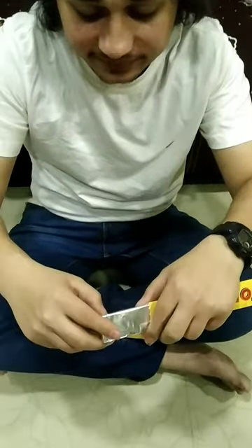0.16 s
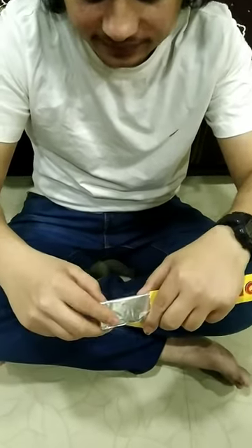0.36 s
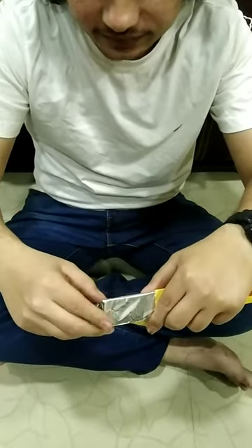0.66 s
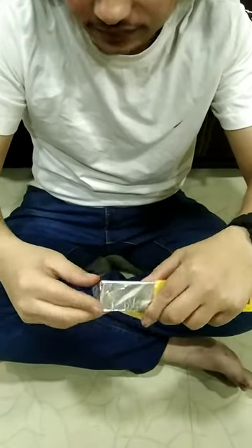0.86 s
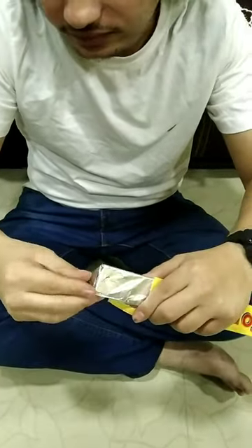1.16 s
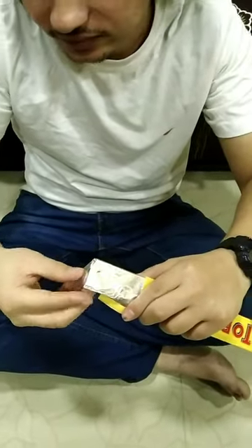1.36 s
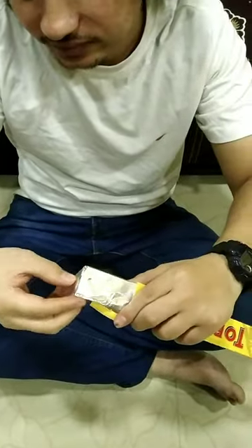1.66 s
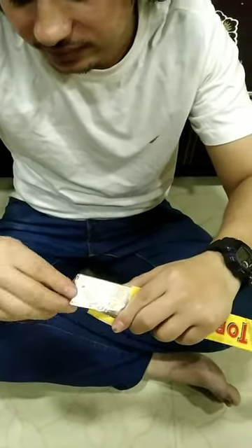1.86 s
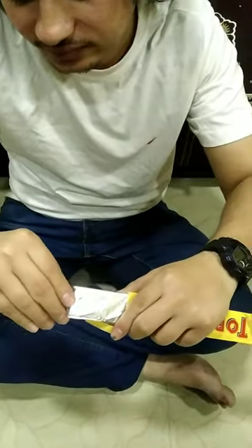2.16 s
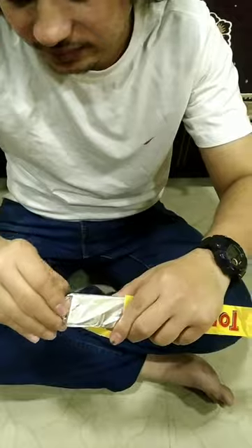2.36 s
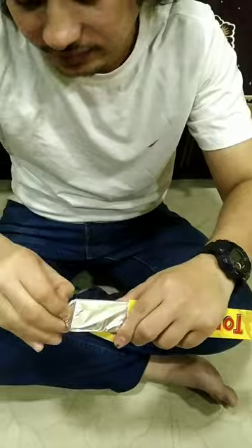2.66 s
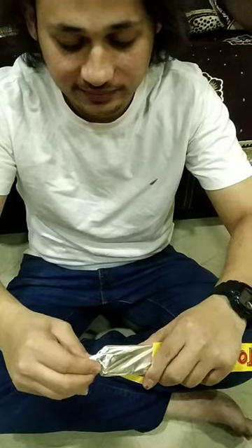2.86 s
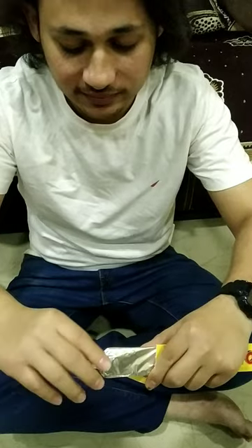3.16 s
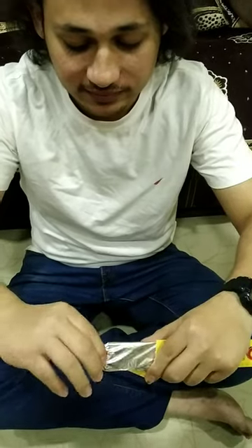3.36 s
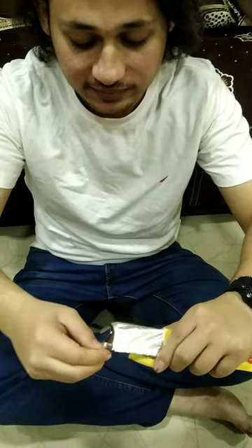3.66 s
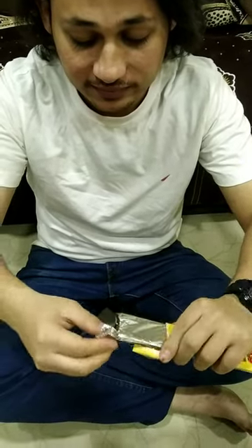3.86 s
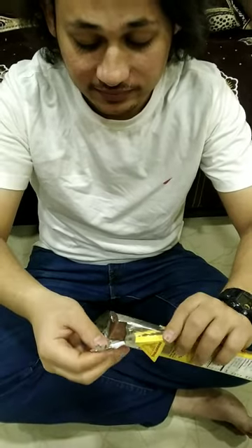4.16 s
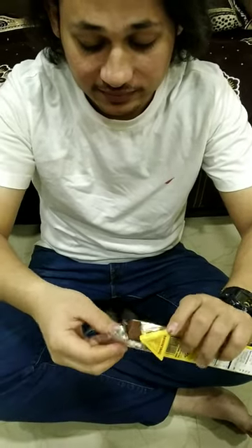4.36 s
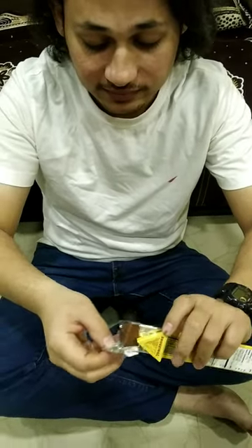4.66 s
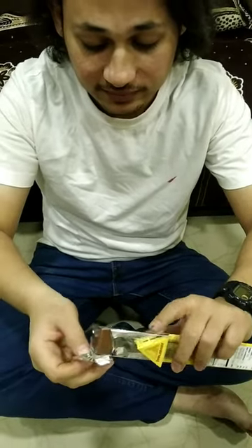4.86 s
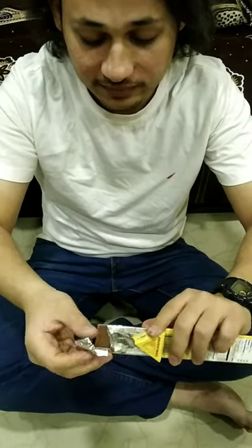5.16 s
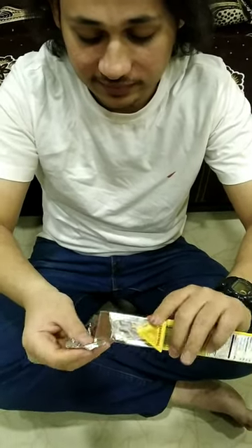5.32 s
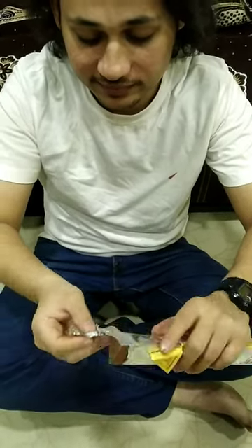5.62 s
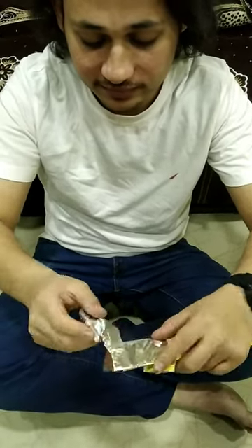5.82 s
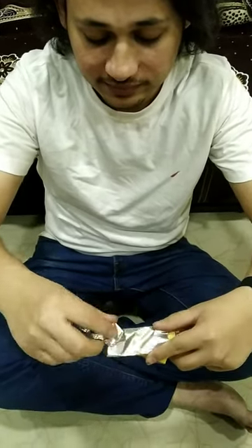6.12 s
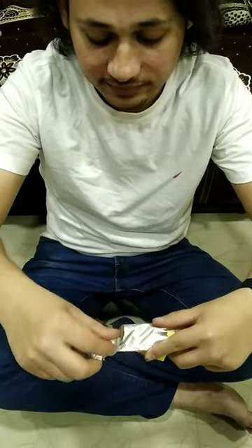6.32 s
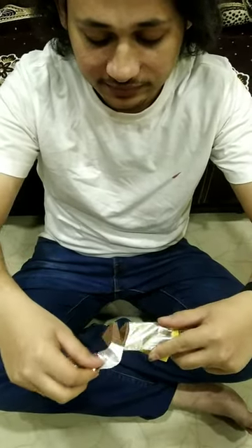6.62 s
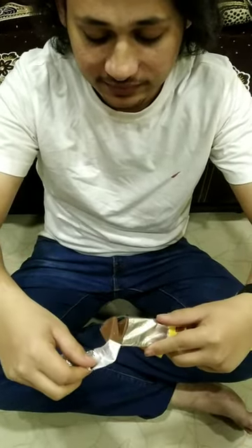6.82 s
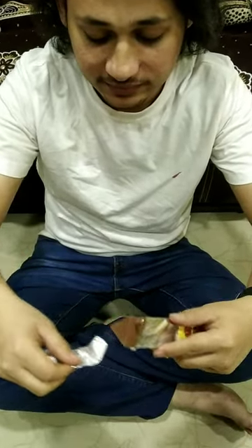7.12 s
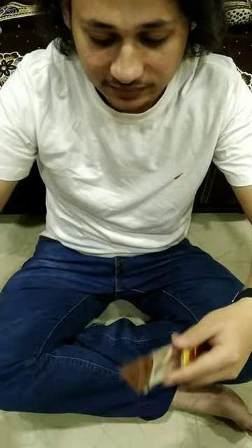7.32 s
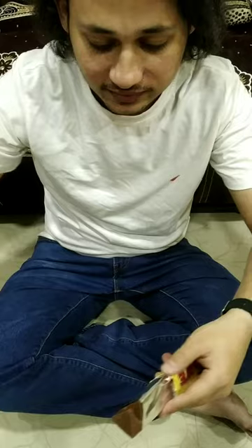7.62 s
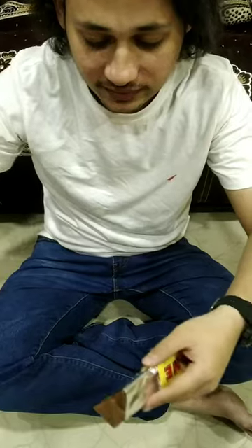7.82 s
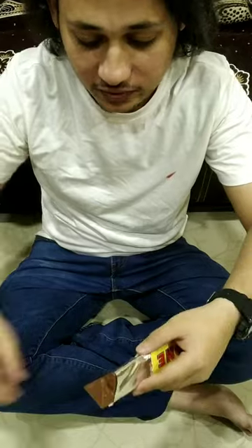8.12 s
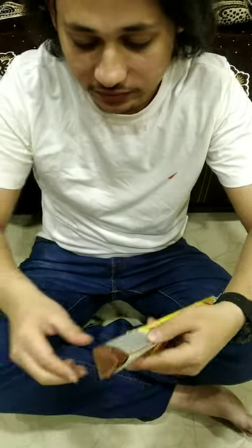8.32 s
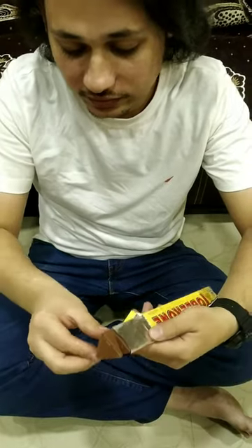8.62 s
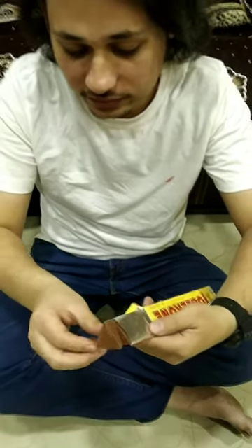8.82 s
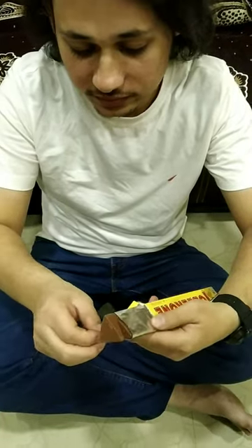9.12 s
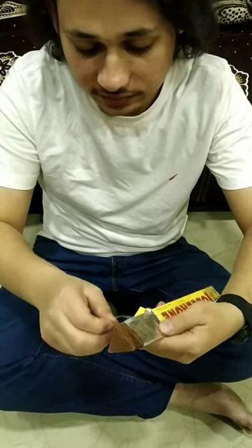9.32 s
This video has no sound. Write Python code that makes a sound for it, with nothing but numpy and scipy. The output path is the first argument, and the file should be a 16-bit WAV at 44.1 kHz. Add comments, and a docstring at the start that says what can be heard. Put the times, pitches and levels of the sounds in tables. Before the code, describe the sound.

At first, sparse foil ticks mix with a short groaning scrape and padded thuds through a wall, then a single dull knock. The foil becomes busy: sharp snaps, fine crackle and little hollow pops as it is peeled from a chocolate bar. Later it calms to isolated crinkles, with a sharp cluster past eight seconds and another at the end. Near stereo phone pickup, small live room, low hum and soft hiss.

```python
"""Tearing a foil wrapper in a quiet room

Fingers peel and tear foil close to a phone: short noise bursts make the snapping creases and fine crackle,
quick sine notes the popping pockets. The walls of the hard-floored room answer a moment later with dying noise.
Next door something heavy scrapes (noise through resonances, jerking in low fading sine notes as it sticks and
slips), knocks once and bumps softly (fading sine notes). A low drone and microphone hiss, both shaped noise,
lie under it all."""
import sys
import numpy as np
from scipy import signal
from scipy.fft import rfft, irfft, next_fast_len
from scipy.io import wavfile
from scipy.ndimage import uniform_filter1d, map_coordinates

SR = 44100
rng = np.random.default_rng(int(sys.argv[2]) if len(sys.argv) > 2 else 0)


def persist_wave(psi):
    """Save psi, clipped to +-1, as 16-bit WAV."""
    counts = np.round(np.clip(psi, -1, 1) * 32767).astype(np.int16)
    wavfile.write(sys.argv[1], SR, np.atleast_2d(counts).T)


N = 418196  # length [samples]


def amp(db):
    """Turn decibels into a plain multiplier."""
    return 10 ** (np.asarray(db) / 20)


def unit(x):
    """Scale a signal to an average (RMS) strength of one."""
    return x / np.sqrt(np.mean(x ** 2) + 1e-20)


def along(points, hz):
    """Read a curve of (frequency [Hz], value) points on a log frequency axis."""
    f, value = np.transpose(points)
    return np.interp(np.log(hz + 1), np.log(f + 1), value)


def curves(rows):
    """Give each level column one value per sample; outside the table it is silent (-120 dB)."""
    s, *columns = np.transpose(rows)
    t = np.arange(N) / SR
    return [np.interp(t, s, column, -120, -120) for column in columns]


def filtered(x, response):
    """Multiply the spectrum of x by a response of frequency."""
    m = next_fast_len(x.shape[-1] + 8192)
    spectrum = rfft(x, m) * response(np.fft.rfftfreq(m, 1 / SR))
    return irfft(spectrum, m)[..., :x.shape[-1]]


def pair(length, alike):
    """Left and right noises that resemble each other by alike(Hz): a shared part plus an opposed part."""
    def shares(hz):
        turn = np.arccos(np.clip(alike(hz), -1, 1)) / 2
        return np.array([np.cos(turn), np.sin(turn)])

    mid, side = filtered(rng.standard_normal((2, length)), shares)
    return np.array([mid + side, mid - side])


def dying(noise, t60_table):
    """Let each frequency of the noise fade by 60 dB in its own time."""
    hz, t, z = signal.stft(noise, SR, nperseg=256)
    fade = amp(-60 * t / along(t60_table, hz)[:, None])
    return signal.istft(z * fade, SR, nperseg=256)[1][:, :noise.shape[1]]


def ringing(hz, db, t60, attack):
    """One gently started sine note that fades by 60 dB in t60 seconds."""
    t = np.arange(SR // 2) / SR
    start = 1 - np.exp(-t / attack)
    return amp(db - 60 * t / t60) * start * np.sin(2 * np.pi * hz * t)


# colour of drone and hiss: (frequency [Hz], relative level [dB per Hz])
BACKGROUND_COLOUR = [(15, -46), (30, -9), (64, -4), (85, -8), (100, -0.5), (120, -9.5), (310, -13),
                     (570, -15), (950, -21.5), (1600, -24.5), (2100, -20), (3300, -28.5), (4700, -24),
                     (15700, -39.5)]
# how alike left and right are: (frequency [Hz], likeness [0 to 1])
BACKGROUND_ALIKE = [(40, 0.76), (150, 0.74), (500, 0.58), (1500, 0.067), (5000, .05)]
BACKGROUND_DB, WAVERS_PER_S = -61.5, 4  # level before the drone wavers; new waver values each second


def background():
    """A house drone, alike on both sides and wavering in level, with hiss that differs left and right."""
    noise = pair(N, lambda hz: along(BACKGROUND_ALIKE, hz))
    noise = unit(filtered(noise, lambda hz: amp(along(BACKGROUND_COLOUR, hz))))
    steps = rng.standard_normal(N * WAVERS_PER_S // SR + 4)
    waver = map_coordinates(steps, [np.arange(N) * WAVERS_PER_S / SR])
    drone = filtered(noise, lambda hz: 1 / (1 + (hz / 130) ** 4))
    return amp(BACKGROUND_DB) * (noise + (amp(0.52 * waver) - 1) * drone)


# how the scrape swells and fades: (time [s], groan level [dB], rumble level [dB])
SCRAPE_LEVELS = [(0.0, -50, -72), (0.024, -52, -65), (0.05, -54, -77), (0.07, -50, -64), (0.104, -46, -71),
                 (0.136, -46, -54), (0.178, -47, -59), (0.202, -47, -49), (0.254, -46, -48),
                 (0.378, -51, -56), (0.434, -55, -65), (0.49, -60, -68), (0.6, -73, -72)]
# resonances, before the response is squared: (frequency [Hz], width [Hz], relative level [dB])
FURNITURE_MODES = [(64, 20, 0), (101, 24, -2.5), (174.4, 24, -2.5), (215, 22, -3), (268, 28, -5),
                   (309.6, 26, -1.5), (345, 47, -4.5), (750, 330, -14), (2100, 900, -14)]


def scrape(split_hz=140):
    """Friction, as noise, shakes the few resonances that come through the wall."""
    def resonances(f):
        total = 0
        for k, (centre, width, db) in enumerate(FURNITURE_MODES):
            mode = 1j * f * width / (centre * centre - f * f + 1j * f * width)
            total = total + amp(db) * mode * (-1) ** k  # neighbours push opposite ways
        return total

    noise = pair(N, lambda hz: 0.92 + 0 * hz)
    groan = unit(filtered(noise, lambda f: resonances(f) ** 2 * (f > split_hz)))
    rumble = unit(filtered(noise, lambda f: resonances(f) ** 2 * (f <= split_hz)))
    groan_db, rumble_db = curves(SCRAPE_LEVELS)
    return amp(groan_db) * groan + amp(rumble_db) * rumble


# low fading notes: jerks of the scrape, then soft bumps; the level is the one before the gentle start: # (time
# [s], frequency [Hz], level [dB], 60 dB fade [s], attack [s])
LOW_NOTES = [(0.0, 258, -29, .13, .03), (.068, 266, -33, .45, .02), (.212, 266, -32, .3, .025),
             (.672, 266.3, -29.5, 0.28, 0.09), (.7, 218, -48, 0.5, 0.013), (1.544, 272, -51, 0.16, 0.0057),
             (1.545, 97, -56, 0.21, .008), (3.076, 69.6, -43.5, 0.11, .005), (4.4, 266, -53, .3, .02),
             (7.05, 252, -45.5, 0.12, .01), (7.084, 212, -51, 0.11, 0.007)]


def low_notes():
    """Fading low notes: the early ones near 266 Hz, up to 0.7 s, are jerks of the scrape as it sticks and
    slips; the later ones are padded contacts."""
    out = np.zeros(N + SR)
    for s, *mode in LOW_NOTES:
        out[round(s * SR):][:SR // 2] += ringing(*mode)
    return out[:N]


# general colour of the foil: (frequency [Hz], relative level [dB per Hz])
FOIL_COLOUR = [(290, -40), (500, -12), (900, -6), (1600, -5), (2100, 0), (3200, 0.3), (4500, 5), (7000, 4),
               (11000, 4), (15700, -1)]
# where the hands are, as the head start of the left side: (time [s], left lead [microseconds])
HAND_POSITION = [(0, 21), (2.5, 10), (3, 71), (7, 69), (8, 99), (9.48, 53)]
# direct sound, then floor and lap: (delay [s], level [dB])
NEAR_ECHOES = [(0, 0), (.0019, -5), (.004, -10.5)]


def creases(times, peak_db, colour_db, rise, t60, alike, size):
    """Each crease rattles the sheet as a short noise burst; colour_db(Hz) gives one spectrum a row."""
    t, hz = np.arange(size) / SR, np.fft.rfftfreq(size, 1 / SR)
    draws = rng.standard_normal((len(times), 2, size))
    life = t60 * np.exp(.25 * draws[:, 0, :1])  # no two creases last alike

    def once(u):
        """A fast rise, then a fade."""
        return np.clip(u / rise, 0, 1) ** 3 * amp(-60 * np.maximum(u - rise, 0) / life)

    # the echoes add their power to the burst's outline
    shape = np.sqrt(sum((amp(db) * once(t - delay)) ** 2 for delay, db in NEAR_ECHOES))
    a, b = np.moveaxis(draws, 1, 0) * shape
    turn = np.arccos(np.clip(alike, 0, 1)) / 2  # each port hears the sheet from another angle
    shared, opposed = np.cos(turn) * a, np.sin(turn) * b
    ports = np.array([shared + opposed, shared - opposed])

    lead = np.interp(times, *np.transpose(HAND_POSITION))[:, None] / 10 ** 6
    # left earlier, right later, by half the lead each
    shift = np.exp(1j * np.pi * hz * lead * np.array([1, -1])[:, None, None])
    # chance peaks of the crumpled facets
    facets = rng.standard_normal((len(times), len(hz)))
    facets = unit(uniform_filter1d(facets, size=size // 64, axis=1))
    gain = amp(along(FOIL_COLOUR, hz) + colour_db(hz) + 4 * facets)
    bursts = irfft(rfft(ports) * gain * shift, size)

    # colouring changed the strength, so set each crease to its own level
    burst_power = np.mean(bursts ** 2, axis=(0, 2))
    shape_power = np.mean(shape ** 2, axis=1)
    bursts = bursts * (amp(peak_db) / np.sqrt(burst_power / shape_power))[:, None]
    first = np.round((times[:, None] - rise) * SR).astype(int)
    at = np.clip(first + np.arange(size), 0, N)
    return np.array([np.bincount(at.ravel(), port.ravel(), N + 1)[:N] for port in bursts])


# pulls on the sheet; swell and fade are the times for a 10 dB change before and after the height:
# (height time [s], swell [s], fade [s], peak level [dB], brightness [dB per octave])
SHEET_PULLS = [(0.085, 0.193, 0.196, -48.0, -5.0), (0.183, 0.02, 0.067, -44.0, -5.0),
               (0.299, 0.054, 0.062, -48.0, -5.0), (0.499, 0.191, 0.018, -56.0, -3.0),
               (0.589, 0.017, 0.005, -41.0, -2.0), (0.685, 0.133, 0.125, -56.0, -4.0),
               (0.747, 0.175, 0.301, -56.0, -6.0), (1.469, 0.187, 0.09, -54.0, 0.0),
               (1.569, 0.058, 0.032, -47.0, 1.0), (1.965, 0.006, 0.024, -54.0, -3.0),
               (2.13, 0.106, 0.067, -50.0, -3.0), (2.225, 0.013, 0.149, -45.0, 1.0),
               (2.333, 0.042, 0.005, -33.0, 1.0), (2.401, 0.024, 0.278, -51.0, 1.0),
               (2.518, 0.019, 0.036, -40.0, 2.0), (2.595, 0.03, 0.159, -46.0, 1.0),
               (2.725, 0.009, 0.032, -32.0, 4.0), (2.808, 0.069, 0.005, -38.0, 0.0),
               (2.878, 0.033, 0.014, -33.0, -1.0), (2.958, 0.277, 0.098, -48.0, 0.0),
               (3.147, 0.005, 0.027, -45.0, 0.0), (3.262, 0.07, 0.009, -37.0, -2.0),
               (3.447, 0.025, 0.02, -38.0, -1.0), (3.488, 0.012, 0.037, -29.0, 0.0),
               (3.57, 0.068, 0.013, -32.0, -3.0), (3.648, 0.041, 0.15, -48.0, -3.0),
               (3.871, 0.083, 0.016, -45.0, 0.0), (3.972, 0.007, 0.08, -48.0, 1.0),
               (4.058, 0.008, 0.153, -36, 2.0), (4.108, 0.02, 0.08, -32, 0),
               (4.154, 0.075, 0.085, -30.5, 0), (4.297, 0.009, 0.068, -37.0, 4.0),
               (4.52, 0.091, 0.005, -37.0, 3.0), (4.572, 0.019, 0.058, -42.0, 0.0),
               (4.712, 0.027, 0.089, -37.0, 1.0), (4.82, 0.072, 0.035, -34.0, -1.0),
               (4.929, 0.237, 0.213, -47.0, 1.0), (5.027, 0.02, 0.018, -35.0, 1.0),
               (5.116, 0.004, 0.034, -38.0, -3.0), (5.224, 0.112, 0.02, -45.0, 0.0),
               (5.341, 0.03, 0.084, -35.0, 1.0), (5.487, 0.047, 0.036, -37.0, 0.0),
               (5.583, 0.079, 0.089, -35.5, -4.0), (5.688, 0.055, 0.241, -42.0, 1.0),
               (5.783, 0.014, 0.039, -36.0, 3.0), (5.88, 0.031, 0.011, -32.0, 2.0),
               (5.972, 0.106, 0.024, -43.0, 0.0), (6.115, 0.006, 0.1, -35, 0),
               (6.175, 0.064, 0.082, -32.0, 0.0), (6.294, 0.162, 0.034, -38.5, -1),
               (6.403, 0.011, 0.039, -47.0, -3.0), (6.51, 0.034, 0.226, -52.0, 0.0),
               (6.595, 0.014, 0.057, -36.0, 0.0), (6.729, 0.077, 0.043, -40, -1.0),
               (6.881, 0.034, 0.026, -45.0, 5.0), (7.081, 0.075, 0.012, -35.0, 0),
               (7.26, 0.01, 0.12, -56, 1), (7.395, 0.012, 0.025, -44.0, -3.0),
               (7.676, 0.151, 0.1, -58.0, 3.0), (7.918, 0.004, 0.075, -38.5, 0),
               (8.023, 0.015, 0.0754, -44.0, 1), (8.199, 0.029, 0.017, -47.0, -2.0),
               (8.338, 0.059, 0.044, -37.0, -4), (8.445, 0.118, 0.006, -48.0, -3.0),
               (8.713, 0.015, 0.035, -50.0, -5.0), (8.801, 0.004, 0.03, -47.0, -6.0),
               (8.878, 0.004, 0.03, -47, -5), (9.177, 0.036, 0.021, -46.0, -2.0),
               (9.239, 0.005, 0.028, -37.0, -2.0), (9.364, 0.044, 0.132, -38.0, 0.0)]
IDLE_DB = -69  # the sheet ticks faintly between pulls
UNEVEN_DB, EVENS_OUT = 4, .065  # size spread at rest; dB of it lost per dB of pull: a hard tear is even
CLUMP_DB, CLUMPS_PER_S = 1.7, 45  # louder and softer bunches: depth and number of level values a second


def crackle(count=13000):
    """Many tiny creases at chance moments, a few much larger than the rest; each pull swells and fades."""
    when, pitch, luck = rng.random((count, 3)).T
    s = when * (N - 1) / SR
    height_s, swell_s, fade_s, peak_db, bright_db = np.transpose(SHEET_PULLS)
    late = s[:, None] - height_s
    pull_db = peak_db - 10 * np.where(late < 0, -late / swell_s, late / fade_s)
    level_db = np.maximum(pull_db.max(axis=1), IDLE_DB)

    spread_db = UNEVEN_DB - EVENS_OUT * (level_db - IDLE_DB)
    rarity = -np.log(1.015 - luck)  # mostly small, now and then large
    # estimate the average power from every 20th draw, so that the spread does not raise it
    mean_power = np.mean(amp(2 * spread_db[:, None] * rarity[::20]), axis=1)
    size_db = spread_db * rarity - 10 * np.log10(mean_power)
    steps = rng.standard_normal(int(N / SR * CLUMPS_PER_S) + 2)
    clumps_db = CLUMP_DB * map_coordinates(steps, [s * CLUMPS_PER_S]) - 1.9

    ring_hz = 3300 * 4.2 ** pitch[:, None]
    slope_db = bright_db[pull_db.argmax(axis=1), None]  # from the strongest pull at that moment

    def colour_db(hz):
        ring = 8 * np.exp(-(np.log((hz + 1) / ring_hz) / 0.11) ** 2)
        tilt = slope_db * np.log2(np.maximum(hz, 2500) / 6500)
        return ring + tilt

    return creases(s, level_db + size_db + clumps_db, colour_db, rise=.0004, t60=.004, alike=.35, size=256)


# creases that snap; the crunch is the low sound under the treble:
# (time [s], peak level [dB], ringing of the facet [Hz], crunch level [dB])
SNAPPING_CREASES = [(0.0563, -34, 11500.0, -22.0), (0.0882, -29.0, 5300.0, -20.0),
                    (0.167, -29, 5100, -19.0), (0.186, -36, 5500, -22), (0.2219, -35.0, 11500.0, -18.0),
                    (0.2907, -32.0, 6000, -17.0), (0.3077, -33.0, 5200.0, -19.0),
                    (0.4314, -40.0, 11800.0, -11.0), (0.4524, -34.0, 5100.0, -19.0),
                    (0.5561, -37.0, 11400.0, -32.0), (0.5771, -30.0, 4800, -21.0),
                    (0.5871, -38.0, 5300.0, -17.0), (0.6868, -37.0, 6100.0, -16.0),
                    (0.7736, -36.0, 5300.0, -20.0), (1.047, -34.0, 6800.0, -20.0),
                    (1.0839, -31.0, 5200.0, -20), (1.1049, -38.0, 8400.0, -19.0), (1.2115, -40, 9000, -22),
                    (1.2166, -33.0, 13500.0, -25.0), (1.2925, -47, 9000, -24),
                    (1.6457, -37.0, 12800.0, -24.0), (1.915, -42.0, 11600.0, -30),
                    (2.0767, -40.0, 13500.0, -30.0), (2.1016, -31.0, 11700.0, -21.0),
                    (2.1415, -40.0, 11700.0, -20.0), (2.1705, -37.0, 5900.0, -16.0),
                    (2.2144, -36.0, 4800.0, -16.0), (2.2643, -32.0, 10400.0, -26.0),
                    (2.293, -33, 8900, -30), (2.3082, -25.0, 11700.0, -22.0), (2.386, -36.0, 5000.0, -22.0),
                    (2.395, -32.0, 11100.0, -32.0), (2.4448, -35.0, 9600.0, -31.0),
                    (2.4708, -31.0, 10600.0, -32.0), (2.5247, -28.0, 9400.0, -28.0),
                    (2.5356, -32.0, 11700.0, -24.0), (2.5446, -34.0, 4400.0, -23.0),
                    (2.6025, -29.0, 8400.0, -32.0), (2.6264, -27.0, 9800.0, -28.0),
                    (2.7236, -27.0, 11400.0, -30.0), (2.7387, -28, 10600, -32),
                    (2.7561, -21.0, 11700.0, -32.0), (2.7839, -33, 5100, -24), (2.838, -31, 5500, -28),
                    (2.8459, -26.0, 12000.0, -32.0), (2.8659, -24.0, 5300.0, -20.0),
                    (2.9746, -36.0, 5200.0, -20.0), (3.0455, -26.0, 4700.0, -18.0),
                    (3.0684, -35.0, 4200.0, -12.0), (3.0814, -31.0, 7600.0, -10.0),
                    (3.1652, -31, 8900, -26), (3.2071, -29.0, 5300.0, -28.0),
                    (3.2231, -27.0, 4000.0, -23.0), (3.235, -26.0, 7200.0, -18.0),
                    (3.4226, -36.0, 8000.0, -28.0), (3.4316, -29.0, 9800.0, -21.0),
                    (3.4925, -22.0, 10700.0, -23.0), (3.5363, -27, 11400, -22),
                    (3.5513, -24.0, 6600.0, -20.0), (3.5733, -21.0, 5800.0, -21.0),
                    (3.681, -38.0, 8300.0, -23.0), (3.704, -34.0, 10600.0, -19.0),
                    (3.7838, -42.0, 10200.0, -32.0), (3.8367, -37.0, 12100.0, -30.0),
                    (3.8478, -35, 10500, -17), (3.8736, -32.0, 7800.0, -15.0),
                    (4.0292, -33.0, 7900.0, -16.0), (4.107, -29, 7700, -17), (4.1362, -27.0, 6900.0, -26.0),
                    (4.2128, -27.0, 9000.0, -26.0), (4.2877, -32.0, 12600.0, -20.0),
                    (4.4064, -38.0, 12100.0, -20.0), (4.4273, -37.0, 11200.0, -21.0),
                    (4.4674, -39, 9000, -22), (4.5092, -29.0, 9800.0, -29.0),
                    (4.577, -36.0, 10000.0, -21.0), (4.6788, -31.0, 11300.0, -23.0),
                    (4.7576, -31.0, 12100.0, -25.0), (4.7895, -30.0, 10400.0, -20.0),
                    (4.8304, -21.0, 3600.0, -17), (4.9322, -36.0, 9600.0, -24.0),
                    (5.005, -33.0, 8700.0, -28.0), (5.032, -32.0, 4500.0, -19.0),
                    (5.1176, -31.0, 4600.0, -17.0), (5.1587, -29.0, 10700.0, -27.0),
                    (5.2195, -29.0, 11300.0, -24.0), (5.2921, -41, 9000, -22),
                    (5.3358, -31.0, 12000.0, -20.0), (5.4001, -32, 6400.0, -19.0),
                    (5.4151, -25.0, 9900.0, -15.0), (5.471, -23.0, 8900.0, -15.0),
                    (5.5238, -29.0, 5000.0, -32.0), (5.5827, -30, 6000.0, -13.0),
                    (5.6745, -30.0, 5300.0, -19.0), (5.7114, -29.0, 12200.0, -24.0),
                    (5.7563, -32.0, 9000.0, -28.0), (5.9576, -38, 9000, -22), (6.0314, -41, 9000, -22),
                    (6.0846, -38.0, 7400.0, -22.0), (6.1099, -31, 9400, -19), (6.1257, -29, 10500, -25),
                    (6.2143, -24.0, 7800.0, -21.0), (6.3949, -38.0, 10500.0, -16.0),
                    (6.4158, -36.0, 5600.0, -20.0), (6.4916, -37.0, 10000.0, -32.0),
                    (6.5006, -32.0, 6900.0, -21.0), (6.5465, -36.0, 6200.0, -32.0),
                    (6.6004, -24.0, 5700.0, -20.0), (6.6922, -26.0, 6900.0, -23.0),
                    (6.7251, -31.0, 5000.0, -25.0), (6.8508, -33, 8800.0, -32.0),
                    (6.8857, -34.0, 9000.0, -18.0), (6.9536, -37.0, 7200.0, -24.0),
                    (7.0773, -30.0, 10600.0, -17.0), (7.257, -45, 12800, -18),
                    (7.3756, -33.0, 8400.0, -30.0), (7.5413, -38.0, 9400.0, -29.0),
                    (7.661, -35.0, 8400.0, -27.0), (7.9166, -37.0, 8600.0, -18.0), (8.028, -37, 11500, -24),
                    (8.1618, -39.0, 8100.0, -32.0), (8.2347, -39.0, 6800.0, -26.0),
                    (8.2626, -38.0, 5600.0, -28.0), (8.2816, -25.0, 4300.0, -30),
                    (8.3025, -21.0, 4800.0, -29), (8.3335, -24.0, 5900.0, -28),
                    (8.4063, -32.0, 4500.0, -30), (8.5031, -42.0, 6000.0, -21.0),
                    (8.7206, -40.0, 7800.0, -20.0), (8.7984, -35.0, 5900.0, -18.0),
                    (8.8752, -36.0, 5700.0, -18.0), (9.0967, -36.0, 8500.0, -26.0),
                    (9.1556, -38.0, 5700.0, -28.0), (9.2344, -30.0, 6400.0, -20.0),
                    (9.2454, -29.0, 4700.0, -20.0), (9.3112, -27.0, 5300.0, -20.0),
                    (9.3641, -34.0, 5200.0, -25.0), (9.3741, -33.0, 5500.0, -17.0),
                    (9.397, -27.0, 8400.0, -29.0), (9.4509, -27.0, 5500.0, -21.0)]
USUAL_CRUNCH_DB = -19.5  # low crunch of a plain crease; larger folds have more


def snaps():
    """Each snapping crease favours the pitch of its facet; big folds reach lower."""
    s, db, ring_hz, crunch_db = np.transpose(SNAPPING_CREASES)

    def colour_db(hz):
        ring = 6 * np.exp(-(np.log((hz + 1) / ring_hz[:, None]) / .25) ** 2)
        body = (crunch_db[:, None] - USUAL_CRUNCH_DB) / (1 + (hz / 2500) ** 4)
        return ring + body

    return creases(s, db, colour_db, rise=.0015, t60=.008, alike=.55, size=768)


def sideways(x, smear_hz=1200):
    """Towards the walls other facets radiate: slow noise multiplies the sound and smears its pitch."""
    return x * unit(filtered(rng.standard_normal(N), lambda hz: hz < smear_hz))


# how long the room rings: (frequency [Hz], 60 dB fade [s])
ROOM_FADE = [(500, 0.22), (3000, 0.28), (8000, 0.24), (15000, 0.18)]


def room(x, delay=.005, build=.006, size=16384):
    """The walls answer after a gap, build up and die away; moving hands meet ever new paths."""
    out, t = np.zeros((2, N + 2 * size + SR)), np.arange(SR // 2) / SR
    onset = np.clip((t - delay) / build, 0, 1)
    window = np.hanning(2 * size + 1)[:-1]
    padded = np.pad(x, (size, 2 * size))
    # overlapping stretches blend into each other, each with a fresh noise tail
    for i in range(0, N + size, size):
        noise = pair(len(t), lambda hz: 0.56 / (1 + (hz / 1200) ** 2))
        tail = onset * dying(noise, ROOM_FADE)
        stretch = padded[i:i + 2 * size] * window
        wet = signal.fftconvolve(stretch[None], tail / np.linalg.norm(tail[0]), axes=1)
        out[:, i:i + wet.shape[1]] += wet[:, :out.shape[1] - i]
    return out[:, size:size + N]


# colour of the wash: (frequency [Hz], relative level [dB per Hz])
KNOCK_COLOUR = [(35, -40), (60, -30), (112, -23), (163, -26), (435, -13.5), (500, -15), (600, -27),
                (1400, -29), (1690, -34), (2270, -36), (3000, -32), (3900, -50), (6600, -120)]
# how long the wash lasts: (frequency [Hz], 60 dB fade [s])
KNOCK_FADE = [(100, 0.32), (400, 0.54), (1000, 0.32), (3000, 0.26)]
# strongest notes, level before the gentle start: (frequency [Hz], level [dB], 60 dB fade [s])
KNOCK_MODES = [(100.4, -41.5, 0.45), (204, -46, .3), (278, -43, 0.26), (325, -35.5, 0.27), (392, -37, 0.28),
               (441, -33.5, 0.33), (470, -41, 0.35), (515, -45, 0.36)]
# the blow itself, level before its start: (frequency [Hz], level [dB], 60 dB fade [s], attack [s])
BLOW = (450, -30.5, .02, .0003)
KNOCK_AT, KNOCK_DB = 1.817, -40  # time [s]; level of the wash before it swells and dies


def knock():
    """A dull blow: its strongest modes swell as they arrive by many paths, over a dying wash."""
    noise = pair(SR // 2, lambda hz: 0.71 + 0 * hz)
    noise = unit(filtered(noise, lambda hz: amp(along(KNOCK_COLOUR, hz))))
    modes = sum(ringing(*mode, attack=.04) for mode in KNOCK_MODES) - ringing(*BLOW)
    swell = 1 - np.exp(-np.arange(SR // 2) / SR / .002)
    blow = modes + amp(KNOCK_DB) * swell * dying(noise, KNOCK_FADE)
    return np.pad(blow, [(0, 0), (round(KNOCK_AT * SR), N)])[:, :N]


# pockets of foil that pop with a clear low pitch: (time [s], frequency [Hz], level [dB])
POCKETS = [(3.046, 690, -46), (3.067, 1860, -44), (3.234, 1210, -45), (3.571, 1360, -42), (3.975, 650, -47),
           (4.102, 1980, -42), (4.829, 1200, -36), (5.413, 900, -42), (5.538, 1300, -42), (5.59, 2000, -38),
           (6.109, 970, -46), (7.043, 1900, -42), (8.28, 2600, -38), (8.406, 2200, -44)]
POP_CYCLES = 28  # cycles in which a pop dies by 60 dB


def pops():
    """Each pocket sounds one short sine note; the two ports hear it a little out of step."""
    out, t = np.zeros((2, N + SR)), np.arange(SR // 10) / SR
    turns = rng.uniform(-1, 1, (len(POCKETS), 2, 1))  # phase [radians]
    for (s, hz, db), turn in zip(POCKETS, turns):
        fade = amp(db - 60 * t * hz / POP_CYCLES)
        start = np.minimum(t * hz, 1)  # rises over one cycle
        note = fade * start * np.sin(2 * np.pi * hz * t + turn)
        out[:, round(s * SR):][:, :len(t)] += note
    return out[:, :N]


def scene():
    """Add the near foil and its room, the sounds next door and the background."""
    far = scrape() + low_notes() + knock()
    foil = crackle() + snaps() + pops()
    near = foil + amp(-6.3) * room(sideways(foil[0]))
    # left and right trims [dB]
    return near * amp([[.5], [-.5]]) + far * amp([[1.1], [-1.1]]) + background() * amp([[.6], [-.6]])


TOP_HZ = 15780  # band limit of the phone


def record(dry):
    """The microphones lose the deepest bass; the phone keeps nothing above its band limit."""
    return filtered(dry, lambda hz: (hz < TOP_HZ) * hz ** 3 / (hz ** 3 + 38 ** 3))


dry = scene()
out = record(dry)
persist_wave(out)
```